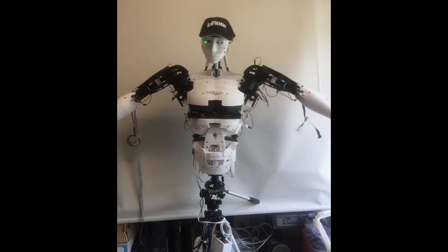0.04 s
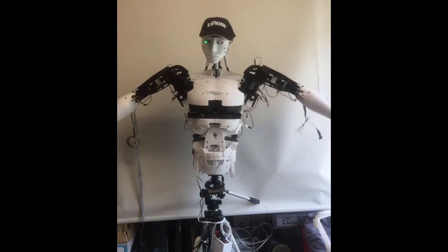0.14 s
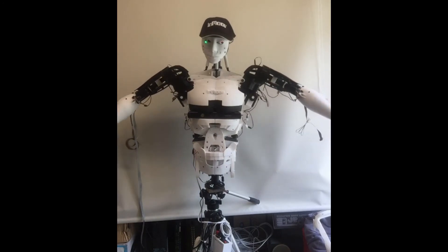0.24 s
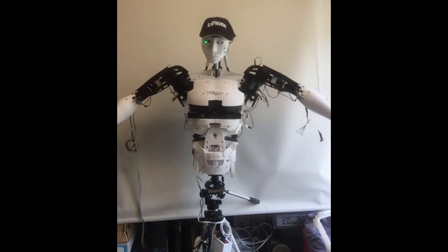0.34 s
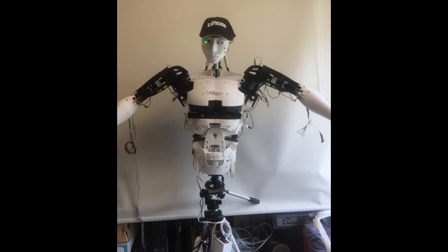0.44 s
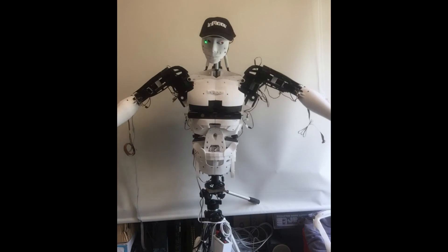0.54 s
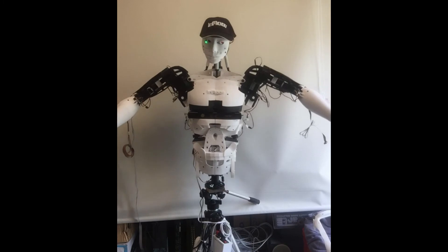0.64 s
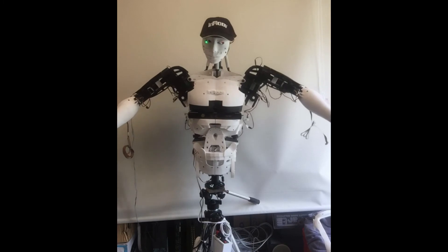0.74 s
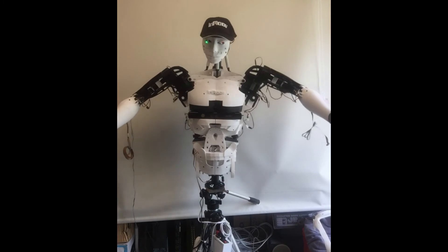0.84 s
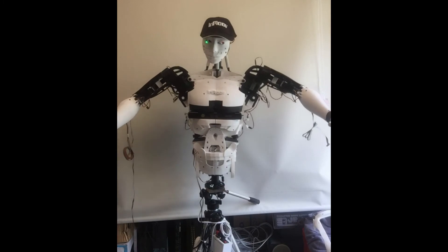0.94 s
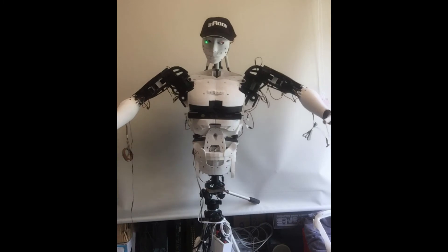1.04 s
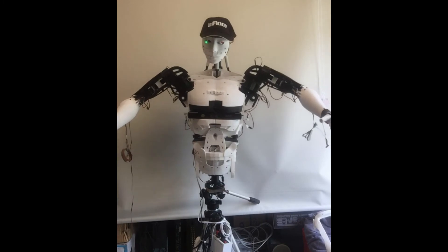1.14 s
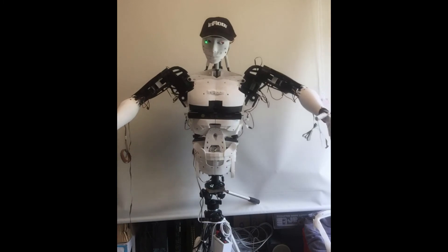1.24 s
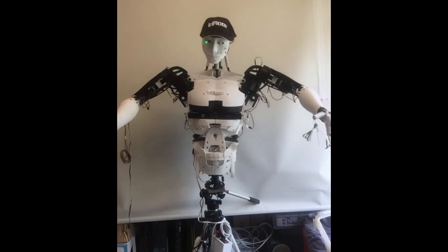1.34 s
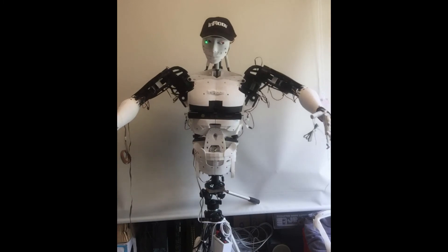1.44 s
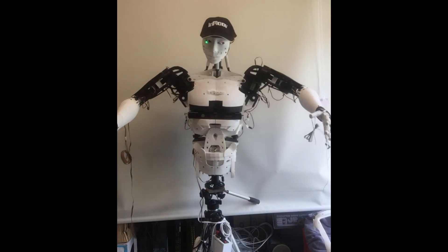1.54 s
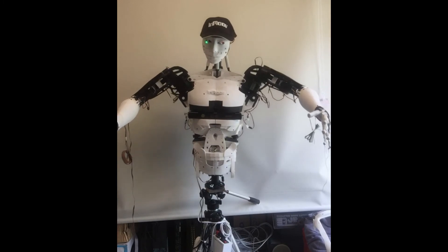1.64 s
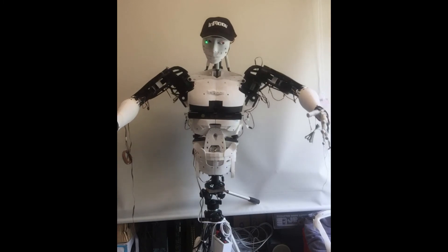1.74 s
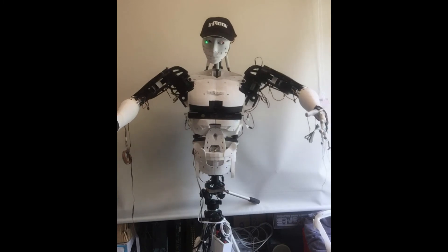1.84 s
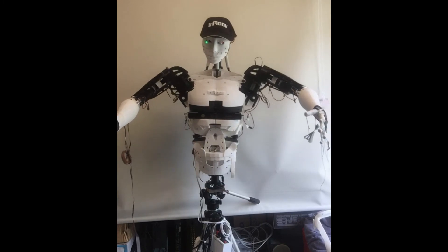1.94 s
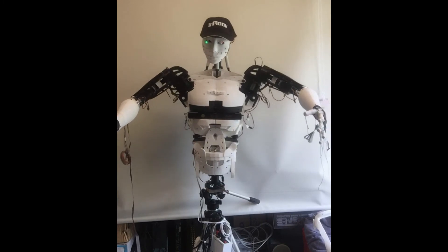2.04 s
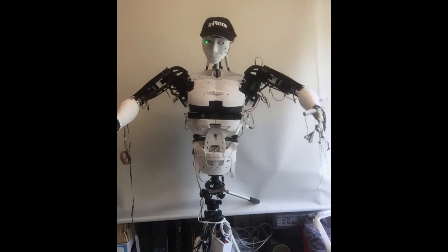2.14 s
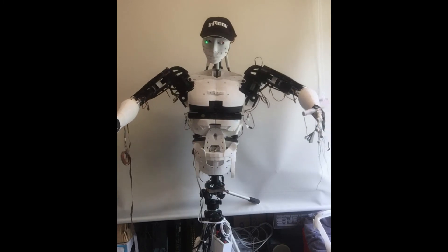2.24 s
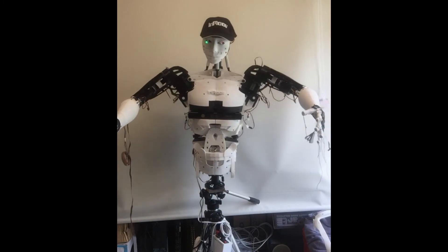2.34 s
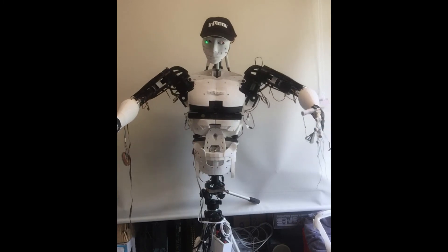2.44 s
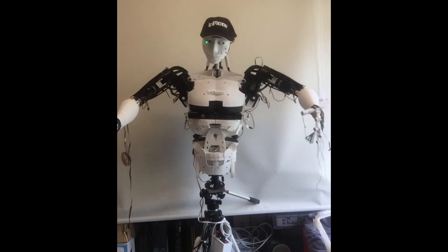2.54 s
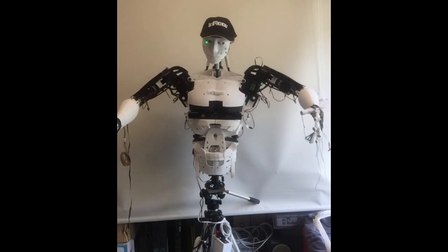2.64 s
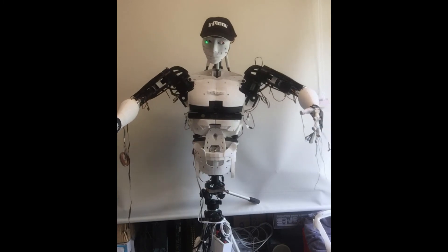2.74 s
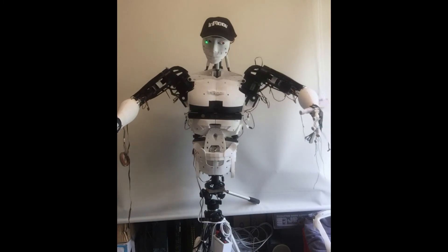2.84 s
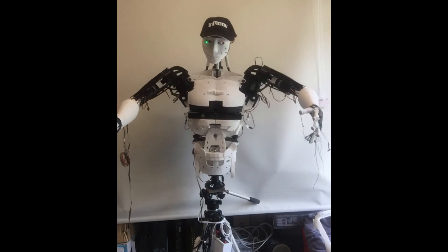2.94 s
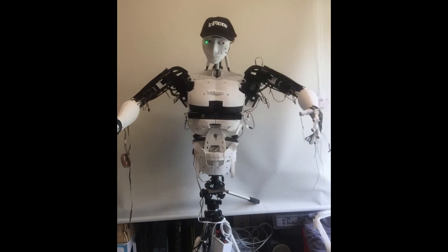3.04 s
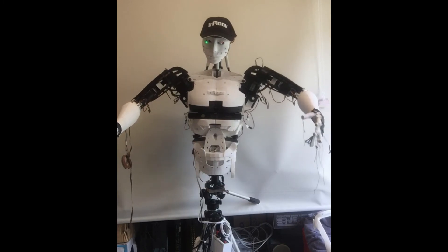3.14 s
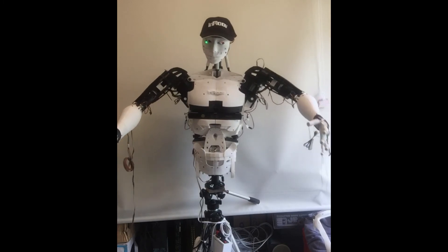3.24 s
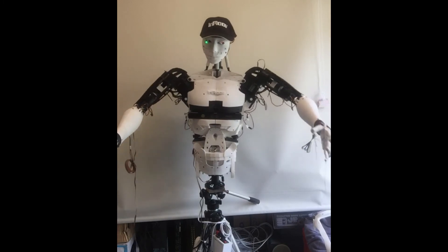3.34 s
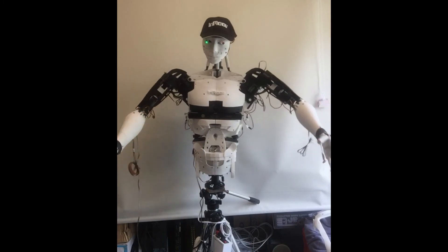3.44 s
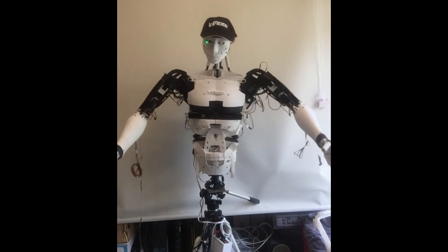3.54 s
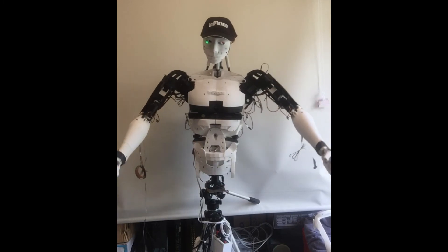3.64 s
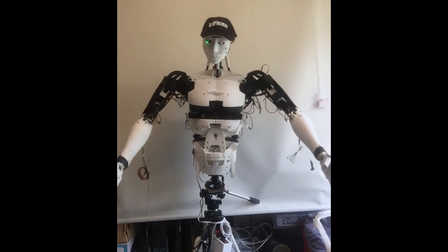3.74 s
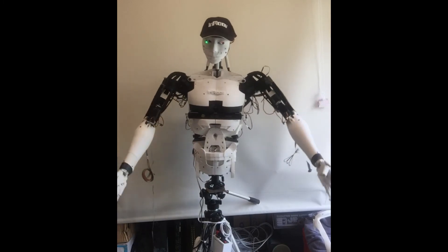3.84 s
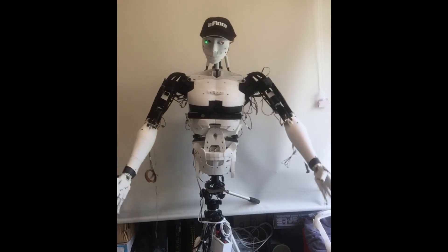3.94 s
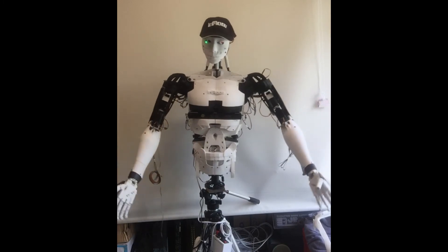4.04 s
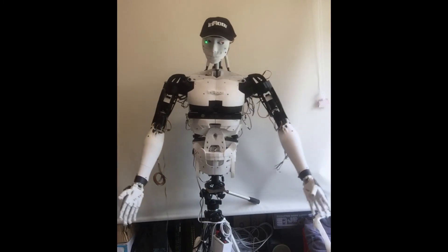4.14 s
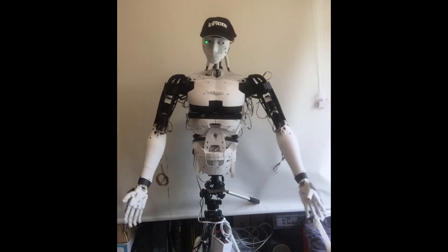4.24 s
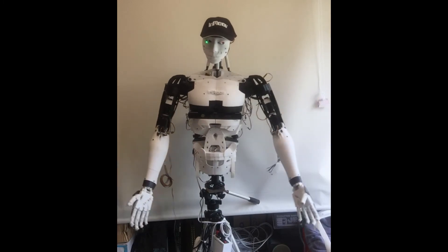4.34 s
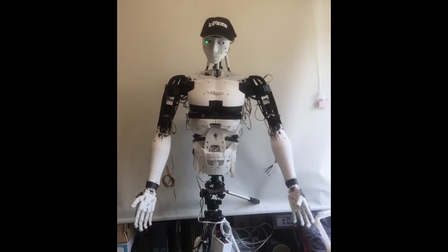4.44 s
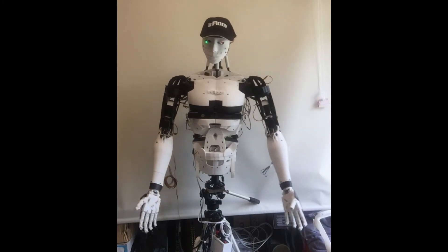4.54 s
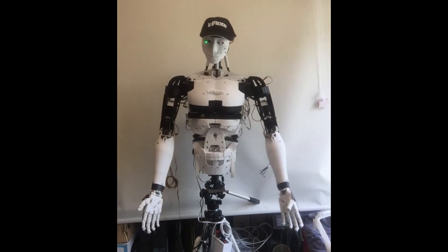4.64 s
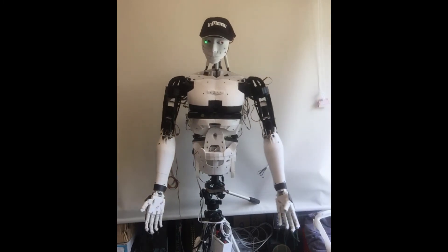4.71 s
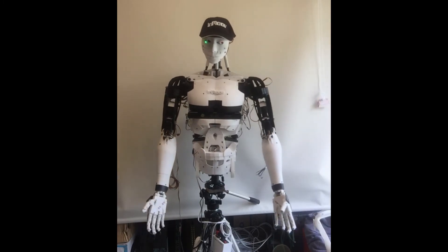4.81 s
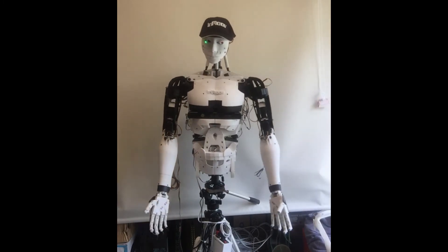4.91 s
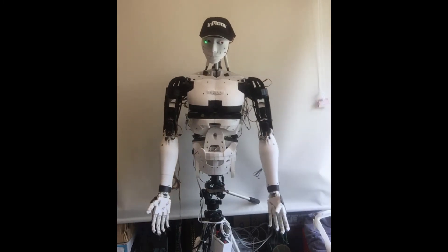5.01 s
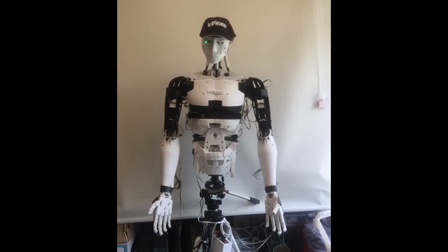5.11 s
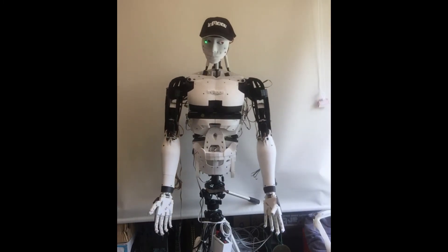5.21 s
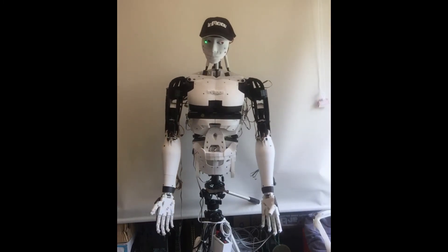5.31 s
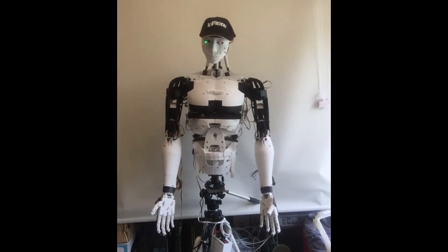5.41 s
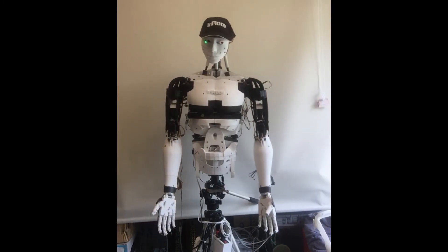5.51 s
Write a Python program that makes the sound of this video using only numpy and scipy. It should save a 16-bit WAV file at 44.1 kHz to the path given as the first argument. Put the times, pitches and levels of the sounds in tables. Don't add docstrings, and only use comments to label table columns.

```python
import sys
import numpy as np
from scipy import signal
from scipy.fft import rfft, irfft, next_fast_len
from scipy.io import wavfile
from scipy.ndimage import uniform_filter1d

SR = 44100
rng = np.random.default_rng(int(sys.argv[2]) if len(sys.argv) > 2 else 0)


def rack_gain(trim_db):
    fader = np.asarray(trim_db, float)
    return 10 ** (fader / 20)


def unload_audio(sound):
    columns = np.transpose(np.atleast_2d(sound))
    steps = np.round(np.clip(columns, -1, 1) * 32767)
    wavfile.write(sys.argv[1], SR, steps.astype(np.int16))


N = 245637
TIME_S = np.arange(N) / SR
FIRST_MOVE = TIME_S < 3


def rms_one(x):
    return x / np.sqrt(np.mean(x ** 2) + 1e-20)


def in_time(rows):
    s, *columns = np.transpose(rows)
    return [np.interp(TIME_S, s, column) for column in columns]


def drift(rate):
    r = np.exp(-80 * np.pi * rate / SR)
    steps = rng.standard_normal(N // 40 + 2002)
    slow = signal.lfilter([1], [1, -2 * r, r * r], steps)[2000:]
    return np.interp(np.arange(N) / 40, np.arange(len(slow)), rms_one(slow))


def band(x, low_hz, high_hz):
    return signal.sosfilt(signal.butter(2, [low_hz, high_hz], "band", fs=SR, output="sos"), x)


def resonate(x, hz, width):
    r = np.exp(-np.pi * width / SR)
    feedback = [1, -2 * r * np.cos(2 * np.pi * hz / SR), r * r]
    return signal.lfilter(np.array([1, 0, -1]) * (1 - r * r) / 2, feedback, x + 1e-18)


def coloured(x, spectrum):
    hz, db = np.transpose(spectrum)
    size = next_fast_len(N)
    log_hz = np.log(np.arange(size // 2 + 1) * SR / size + 1)
    gain = rack_gain(np.interp(log_hz, np.log(hz), db))
    return rms_one(irfft(rfft(x, size) * gain, size)[:N])


def fade(start, end, edge):
    ramp = np.clip(np.minimum(TIME_S - start, end - TIME_S) / edge, 0, 1)
    return np.sin(np.pi / 2 * ramp) ** 2


# f/Hz, half width/Hz, gain/dB
HOUSING_PEAKS = [(1940, 45, 12), (3200, 80, 9), (3700, 300, 4), (4500, 60, 4), (5240, 70, 4),
                 (5480, 130, 6), (7780, 200, 3), (11400, 500, 11), (12700, 650, 9)]


def motor(rows, orders, wobble, flicker_db, trim_db):
    start, end = rows[0][0] - .04, rows[-1][0] + .01
    span = slice(max(int(start * SR), 0), int(end * SR))
    hz, effort_db = [column[span] for column in in_time(rows)]
    speed_change = abs(np.gradient(np.log(hz))) * SR
    load_db = np.minimum(2.2 * uniform_filter1d(speed_change, size=1500), 3)
    hunting = wobble * (1 + .8 * load_db) * drift(29)[span]
    turns = np.cumsum(hz * (1 + hunting)) / SR
    tones, top = np.zeros(N), max(orders)[0]
    for order, db in orders:
        order = round(order)
        housing_db = sum(gain_db / (1 + ((order * hz - centre) / width) ** 2)
                         for centre, width, gain_db in HOUSING_PEAKS)
        chance_db = (flicker_db * drift(12) + 3.2 * drift(45))[span]
        sharpen_db = load_db * (order / top) ** .7
        level_db = db + effort_db + housing_db + trim_db + sharpen_db + chance_db
        tones[span] += rack_gain(level_db) * np.sin(2 * np.pi * order * turns)
    return np.sqrt(2) * tones * fade(start, end, .07)


# t/s, tooth rate f/Hz, level/dB
FIRST_ELBOW = [(0, 923.5, -1), (0.098, 945, -0.5), (0.198, 959.7, 4), (0.301, 938, 6.5),
               (0.451, 961.5, 2.5), (.6, 953.6, -0.5), (0.801, 923, -4.5), (.93, 914, -21)]
SECOND_ELBOW = [(0, 893, -7), (.1, 936, 2), (.2, 945, 2), (.3, 939, 3), (.5, 938, 2), (.6, 918, 1),
                (.7, 882, -1), (.8, 857, -9)]
WRIST_MOTOR = [(0.227, 128, -8), (.319, 138, 2), (.45, 139, 2), (.6, 137.5, 1), (.72, 133, -2),
               (.83, 125, -12)]
ELBOW_BRAKING = [(.935, 915, -6), (.97, 830, -9), (.99, 768, 4), (1.015, 740, 5), (1.04, 712, 2),
                 (1.08, 672, -7), (1.12, 630, -20)]
# order (multiple of the tooth rate), level/dB
ELBOW_TONES = [
    [(2, -71), (4, -51), (5, -57), (6, -48.5), (8, -57)],
    [(2, -68), (4, -45), (5, -52), (7, -54), (8, -61)],
    [(6, -66), (7, -66), (9, -70)],
    [(4, -52.5), (8, -43.5)],
]


def elbow_whine():
    motors = zip([FIRST_ELBOW, SECOND_ELBOW, WRIST_MOTOR, ELBOW_BRAKING], ELBOW_TONES)
    return sum(motor(rows, orders, wobble=.003, flicker_db=2.2, trim_db=-2.2) for rows, orders in motors)


def gear_errors(rows, shaft_share, coast_s, spread_db):
    late = np.clip(TIME_S - rows[-1][0], 0, None)
    shaft_hz = shaft_share * in_time(rows)[0] * (.7 + .3 * np.exp(-late / coast_s))
    turns = np.cumsum(shaft_hz * (1 + .002 * drift(15))) / SR
    sizes = rack_gain(spread_db * rng.standard_normal((4, 100)))
    orders = sizes * np.exp(2j * np.pi * rng.random((4, 100)))
    orders = orders * signal.windows.tukey(100, .35)
    patterns = [np.interp(turns % 1, np.linspace(0, 1, 2048), irfft(row, 2048)) for row in orders]
    shares = np.array([drift(7) for _ in patterns])
    return rms_one(np.sum(shares * patterns, axis=0) / np.linalg.norm(shares, axis=0))


# t/s, level/dB, gear speed (0 to 1)
RATTLE_COURSE = [(0, -39, 0.76), (.14, -38.5, 0.84), (.8, -35.5, 0.72), (1.01, -35.5, 0.4),
                 (1.53, -50, 0.46), (1.65, -50.5, 0.34), (2.4, -53.5, 0), (3.0, -54, 0.57),
                 (3.06, -47, 0.44), (3.17, -37.5, 0.48), (3.3, -34, 0.67), (3.44, -35.5, 0.79),
                 (3.73, -35, 0.99), (4.29, -37, 0.97), (4.71, -40.5, 0.67), (5.02, -46.5, 0.49),
                 (5.3, -53.5, 0.14), (5.57, -62.5, 0.01)]
# f/Hz, level/dB (per Hz)
RATTLE_COLOURS = [
    [(180, -59.5), (300, -36.5), (797, -18), (1070, -11.5), (1570, -16), (1950, -6.5), (2380, -8),
     (3780, -5.5), (4850, -4), (5720, 2), (7700, -8.5), (10200, -19), (12500, -25), (15700, -38)],
    [(180, -60), (300, -32.5), (664, -15), (810, -23.5), (972, -14), (1400, -15.5), (1740, -7),
     (2540, -10.5), (3310, -11), (4850, -10.5), (5440, -0.5), (10200, -21), (12000, -22), (15700, -35)],
]
# f/Hz, width/Hz, level/dB
CASE_RINGS = [(350.6, 9, 5.5), (530, 28, 2.5), (1150, 490, -38), (1853, 22, -9), (2173, 11, -9),
              (3260, 60, -48), (3735, 1330, -5.5), (4190, 44, -3), (5300, 150, -22), (5200, 50, -25),
              (7960, 47, -5), (11465, 220, -40)]
# level/dB at rest, gain/dB at full speed
SPEED_GAINS = [
    (-26, 19),
    (-2.5, 2.5),
    (-18.5, 16.5),
]


def rattle():
    case_db, speed = in_time(RATTLE_COURSE)
    low_db, upper_db, hiss_db = [rest_db + gain_db * speed for rest_db, gain_db in SPEED_GAINS]
    sizes = rack_gain(2.9 * np.minimum(rng.exponential(1, N), 5)) * rng.choice([-1, 1], N)
    hits = rng.random(N) < 7000 / SR
    loose = rms_one(sizes * hits) + .4 * rng.standard_normal(N)
    elbows = sum(gear_errors(rows, .2, coast_s=.6, spread_db=4)
                 for rows in [FIRST_ELBOW + ELBOW_BRAKING, SECOND_ELBOW])
    shoulders = sum(gear_errors(rows, .3, coast_s=.9, spread_db=4)
                    for rows in [SHOULDER_START + FIRST_SHOULDER, SECOND_SHOULDER, THIRD_SHOULDER])
    recurring = np.where(FIRST_MOVE, rms_one(elbows), rms_one(shoulders))
    slow = np.clip(1 - speed, 0, 1)
    share = .85 + .18 * slow
    contacts = (loose + share * recurring) / np.sqrt(1 + share ** 2)
    rung = sum((-1) ** k * rack_gain(db) * resonate(contacts, hz, width)
               for k, (hz, width, db) in enumerate(CASE_RINGS))
    struck = contacts + (2.6 + .41 * slow) * rung
    first, second = [coloured(struck, colour) for colour in RATTLE_COLOURS]
    sound = np.where(FIRST_MOVE, first, second)
    sound = sound - .6 * resonate(sound, 10370, 470)
    clumps_db = .3 * drift(12) + .9 * drift(35)
    parts = [(262, 2276, low_db - .5), (2934, 4500, -1.08), (4670, 7760, upper_db - .5),
             (9430, 18877, hiss_db - .5)]
    out = np.zeros(N)
    for low, high, db in parts:
        part = rms_one(band(band(sound, low, high), 1.003 * low, 1.168 * high))
        out += rack_gain(case_db + db + clumps_db + .55 * drift(12)) * part
    running = fade(-1, 2.6, 1.1) + fade(3, 7, .07)
    return running * out


# f/Hz, level/dB (per Hz)
AIR_COLOUR = [(40, -4.5), (70, -6.5), (200, -10), (714, -17.5), (1090, -6.5), (1400, -15), (2440, -19),
              (4000, -13.5), (8000, -25), (15700, -54)]


def room_noise():
    return rack_gain(-62 + drift(2.5)) * coloured(rng.standard_normal(N), AIR_COLOUR)


def stand_rumble():
    shake = rng.standard_normal(N)
    load_db = in_time(RATTLE_COURSE)[0] + 36
    hum = rack_gain(.54 * load_db) * rms_one(resonate(shake, 66, 11))
    broad = rack_gain(2 + .36 * load_db) * rms_one(band(band(shake, 44, 136), 46, 156))
    return rack_gain(-67.5 + 1.5 * drift(3.7)) * (hum + broad)


# start t/s, end t/s, from f/Hz, to f/Hz, level/dB
EARLY_SQUEAL_EVENTS = [(.765, .83, 5500, 5500, -47), (.91, 1.0, 2140, 2120, -60),
                       (1.02, 1.14, 1970, 1990, -57), (1.08, 1.14, 2150, 2130, -61),
                       (1.15, 1.2, 2200, 2180, -60), (.8, .91, 1780, 1760, -64),
                       (1.27, 1.41, 2680, 2650, -58), (1.36, 1.45, 4250, 4000, -57),
                       (.98, 1.15, 4250, 3850, -47), (.85, .92, 4850, 4590, -48),
                       (.86, .94, 6200, 5950, -45.5), (1.08, 1.18, 5980, 5920, -48.5),
                       (0.81, 1.1, 3760, 3600, -55), (1.09, 1.15, 3800, 4500, -48),
                       (1.27, 1.35, 3560, 3100, -54), (1.447, 1.64, 2200, 2160, -63),
                       (.04, .25, 2580, 2520, -59)]
LATE_SQUEAL_EVENTS = [(3.245, 3.32, 5450, 5650, -42), (3.04, 3.09, 2560, 2580, -66),
                      (3.165, 3.215, 5300, 5550, -39), (3.235, 3.335, 5250, 5330, -38),
                      (3.34, 3.41, 5300, 5520, -41), (4.212, 4.33, 7800, 7740, -44),
                      (4.37, 4.45, 3800, 3650, -47), (4.45, 4.56, 3450, 3340, -51),
                      (4.39, 4.48, 4540, 4490, -48), (4.53, 4.61, 4550, 4480, -50),
                      (4.26, 4.37, 990, 970, -63), (3.73, 3.81, 530, 530, -62),
                      (4.54, 4.6, 1640, 1600, -61), (3.68, 3.73, 2120, 2130, -55),
                      (4.54, 4.66, 620, 650, -67), (4.55, 4.66, 3450, 3600, -51),
                      (4.66, 4.76, 3800, 3600, -51), (4.52, 4.62, 4600, 5000, -53),
                      (4.53, 4.62, 5220, 5120, -56), (4.58, 4.72, 3920, 3700, -50),
                      (4.66, 4.82, 3400, 3500, -52), (4.7, 4.82, 5100, 4520, -59),
                      (4.72, 4.79, 3500, 3200, -56), (4.84, 5.0, 3800, 3680, -54),
                      (4.86, 4.97, 5300, 5230, -49), (4.93, 5.0, 3480, 3300, -58),
                      (4.8, 4.92, 4350, 4000, -55), (5.02, 5.12, 4230, 4120, -60),
                      (5.04, 5.17, 5250, 5300, -52.5), (5.06, 5.16, 1920, 1900, -67),
                      (5.12, 5.2, 3880, 3800, -59), (5.16, 5.26, 4260, 4300, -61),
                      (5.16, 5.26, 1700, 1650, -68.5), (4.62, 4.7, 5680, 5580, -58)]


def squeals():
    out = np.zeros(N)
    wander, flicker_db = .005 * drift(25), 3 * drift(30) + 3 * drift(70)
    for k, (start, end, from_hz, to_hz, db) in enumerate(EARLY_SQUEAL_EVENTS + LATE_SQUEAL_EVENTS):
        span = slice(int(start * SR), int(end * SR))
        glide = np.linspace(from_hz, to_hz, span.stop - span.start)
        hz = glide * (1 + np.roll(wander, 9000 * k)[span])
        level = rack_gain(db + 4 + np.roll(flicker_db, 7000 * k)[span]) * fade(start, end, .025)[span]
        out[span] += level * np.sin(2 * np.pi * np.cumsum(hz) / SR)
    return out


# t/s, peak level/dB, f/Hz, time to fade by 60 dB t/s
THUD_EVENTS = [(0.198, -51, 65, 0.3), (0.419, -46.5, 64, 0.15), (0.92, -60, 62.7, 0.17),
               (1.97, -58, 61.2, 0.15), (3.22, -50, 69, 0.21), (3.667, -34, 66, 0.18),
               (3.92, -51, 65.7, .2), (4.1, -58, 63, 0.21), (4.53, -53, 59.54, 0.31),
               (4.9, -51.5, 67.4, 0.19)]


def thuds():
    out = np.zeros(N)
    for s, db, hz, t60 in THUD_EVENTS:
        age = np.clip(TIME_S - s + .0206, 0, None)
        swell = (1 - np.exp(-age / .0056)) ** 2
        out += rack_gain(db + 3.5) * swell * rack_gain(-60 * age / max(t60, .03)) * np.sin(2 * np.pi * hz * age)
    return out


# t/s, peak level/dB, low part level/dB, high part level/dB (against the peak),
# time to fade by 60 dB t/s
TICK_EVENTS = [(0.286, -52, 5, -9, 0.061), (1.093, -49, -15, -12, 0.058), (2.492, -63, -10, -20, 0.04),
               (2.657, -61, -1, -7, 0.097), (2.775, -55, -7, 2.5, 0.053), (3.284, -32, -10, -27, 0.11),
               (3.493, -46.5, 6, -15, 0.12), (4.367, -46, 7, 8, 0.06), (5.405, -40, -7, 1, 0.039),
               (5.409, -53, 5.5, -16, 0.086), (5.454, -69, -8, -16, 0.081), (5.471, -62, 7, -15, 0.055),
               (5.531, -54, 1, -14.5, 0.054)]


def ticks():
    out, white = np.zeros(N), rng.standard_normal(N)
    edges_hz = [(1050, 2500), (3200, 8000), (10500, 14800)]
    low, mid, high = [rms_one(band(white, *edges)) for edges in edges_hz]
    for s, db, low_db, high_db, t60 in TICK_EVENTS:
        age = np.clip(TIME_S - s, 0, None)
        fades = age / max(t60, .01)
        decay = (1 - np.exp(-age / .0003)) * rack_gain(-60 * fades)
        out += rack_gain(db) * decay * (mid + rack_gain(low_db) * low + rack_gain(high_db - 40 * fades) * high)
    return out


# t/s, level/dB
HOLD_COURSE = [(0, -75), (1.2, -76), (1.8, -57), (2.2, -52.5), (2.6, -54.5), (3.0, -55), (3.15, -65),
               (5.57, -57.5)]
# f/Hz, width/Hz, level/dB
HOLD_RINGS = [(1104, 75, -8.5), (3460, 240, -2), (3720, 220, -4), (4030, 200, -1), (4230, 180, -6),
              (4520, 150, -11), (5100, 120, -11), (5380, 160, -13), (6170, 160, -17)]


def hold_buzz():
    pulse_hz, pulse_start_s = 49.69, 2.5935
    pulses = (TIME_S - pulse_start_s) * pulse_hz
    age = (pulses % 1) / pulse_hz
    count = np.floor(pulses).astype(int)
    strength = rack_gain(1.8 * rng.standard_normal(400))[count - count[0]]
    shudder = strength * (1 - np.exp(-age / .0012)) * np.exp(-age / .006) + .18
    alike = .45
    habit = rng.standard_normal(SR // 40)[(age * SR).astype(int)]
    kicks = shudder * (alike * habit + np.sqrt(1 - alike ** 2) * rng.standard_normal(N))
    rung = sum((-1) ** k * rack_gain(db + 2.6 * drift(4.5)) * resonate(kicks, hz, .85 * width)
               for k, (hz, width, db) in enumerate(HOLD_RINGS))
    broad = rack_gain(-22) * band(band(kicks, 3140, 4620), 3520, 4700) + rack_gain(-33) * band(kicks, 3000, 15200)
    return rack_gain(in_time(HOLD_COURSE)[0]) * rms_one(rung + broad)


# t/s, tooth rate f/Hz, level/dB
SHOULDER_START = [(3.145, 292, 5), (3.165, 312, 1), (3.185, 337, 6), (3.21, 375, -3), (3.24, 408, -4),
                  (3.27, 447, 8), (3.3, 478, 9), (3.33, 508, 5), (3.39, 548, -8)]
FIRST_SHOULDER = [(3.395, 551, 4), (3.45, 594.6, 6), (3.6, 633, 2), (3.75, 644, 2), (3.95, 648.5, 2),
                  (4.22, 647, 2), (4.3, 642, 2), (4.37, 636, -14)]
SECOND_SHOULDER = [(3.24, 412, 0), (3.3, 467, 4), (3.43, 545, 2), (3.57, 599, 6), (3.72, 636, -1),
                   (3.96, 654, 8), (4.12, 655, 3), (4.3, 647, -1), (4.47, 631, 0)]
THIRD_SHOULDER = [(3.4, 545.7, -14), (3.551, 595.5, -6), (3.65, 615, -3), (3.849, 630, 2.5), (4.05, 627, 1),
                  (4.13, 617, -5), (4.24, 594, -8), (4.33, 555, -13)]
FOURTH_SHOULDER = [(3.3, 492, -10), (3.35, 530, -2), (3.5, 608, 4.5), (3.65, 629, 2), (3.949, 646.6, 3),
                   (4.15, 643.4, -4), (4.401, 625.7, -4)]
SHOULDER_RUN_OUT = [(4.38, 648, 0), (4.55, 640, -2), (4.7, 600, -17), (4.85, 562, -4), (5.1, 530, -15)]
# order (multiple of the tooth rate), level/dB
START_TONES = [(11, -62), (12, -49), (16, -60)]
SHOULDER_TONES = [
    [(3, -61.5), (6, -56), (8, -58), (9, -55), (12, -54), (16, -70), (20, -66)],
    [(8, -48), (12, -57), (20, -68)],
    [(3, -57), (8, -46), (20, -59)],
    [(5, -59.5), (7, -54), (10, -46.5)],
]
RUN_OUT_TONES = [(5, -67), (6, -62), (7, -65), (9, -52)]


def shoulder_whine():
    motors = zip([FIRST_SHOULDER, SECOND_SHOULDER, THIRD_SHOULDER, FOURTH_SHOULDER], SHOULDER_TONES)
    start = motor(SHOULDER_START, START_TONES, wobble=.005, flicker_db=3, trim_db=0)
    steady = sum(motor(rows, orders, wobble=.0022, flicker_db=1.7, trim_db=-2.5) for rows, orders in motors)
    run_out = motor(SHOULDER_RUN_OUT, RUN_OUT_TONES, wobble=.007, flicker_db=5, trim_db=-2)
    return start + steady + run_out


def room(x):
    size = next_fast_len(N + SR)
    w = 2 * np.pi * np.arange(size // 2 + 1) / size
    echoes = 0
    for k, lag in enumerate((rng.uniform(.009, .03, 10) * SR).astype(int)):
        loop = rack_gain(-60 * lag / SR / .3) * np.exp(-1j * w * lag)
        echoes = echoes + (-1) ** k * loop / (1 - loop)
    return irfft(rfft(x, size) * echoes, size)[:N] / 3


def scene():
    tones = elbow_whine() + squeals() + shoulder_whine()
    grain = rattle() + hold_buzz()
    knocks = thuds() + ticks()
    direct = 1.1 * tones + knocks + .9 * grain
    echo = rack_gain(-3.5) * room(.75 * tones + knocks + .6 * grain)
    return np.tile(direct + echo + room_noise() + stand_rumble(), (2, 1))


def top_cut(x):
    return signal.sosfilt(signal.butter(12, 16530, fs=SR, output="sos"), x)


def record(dry):
    cut = signal.sosfilt(signal.butter(3, 42, "high", fs=SR, output="sos"), dry)
    cut = signal.sosfilt(signal.ellip(10, .5, 70, 15700, fs=SR, output="sos"), cut)
    return top_cut(cut)


dry = scene()
out = record(dry)
unload_audio(out)
```